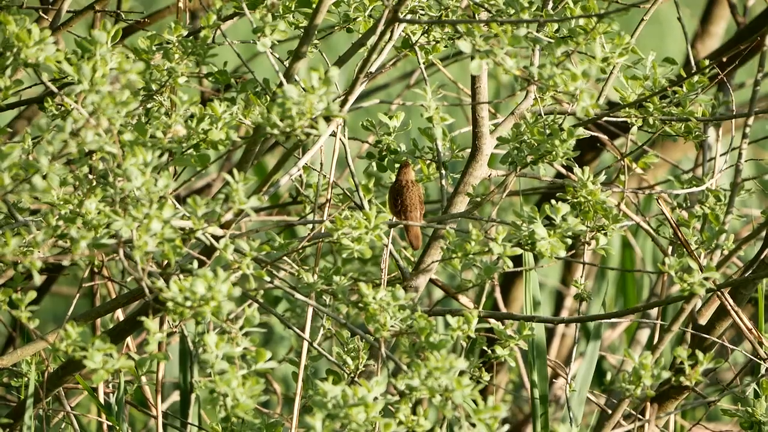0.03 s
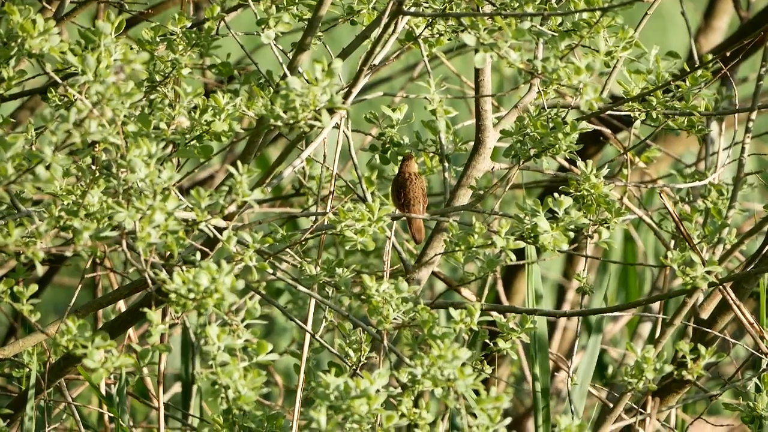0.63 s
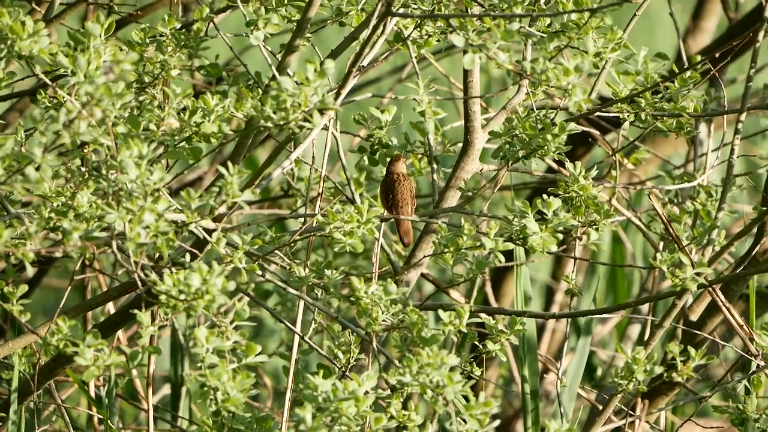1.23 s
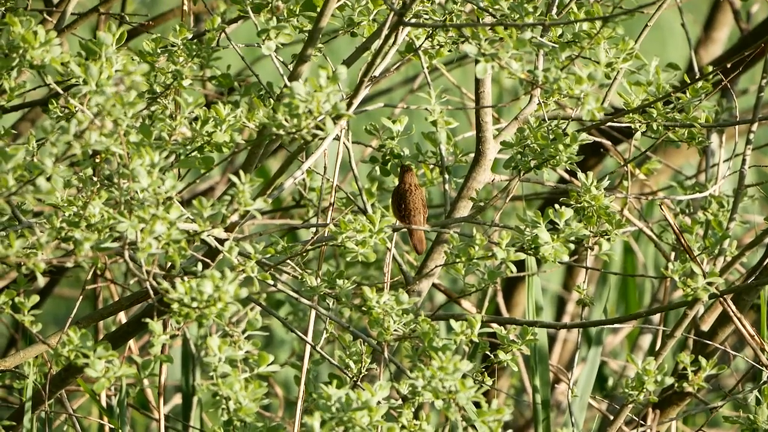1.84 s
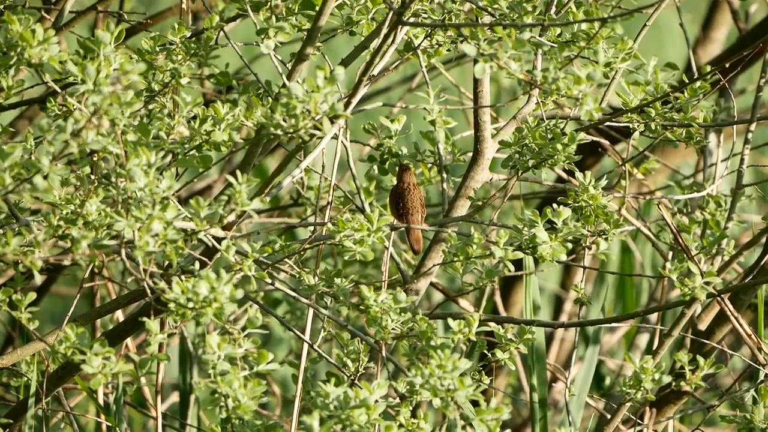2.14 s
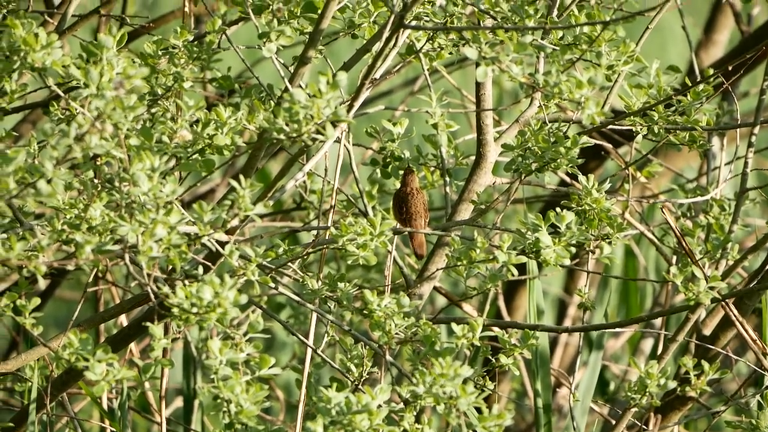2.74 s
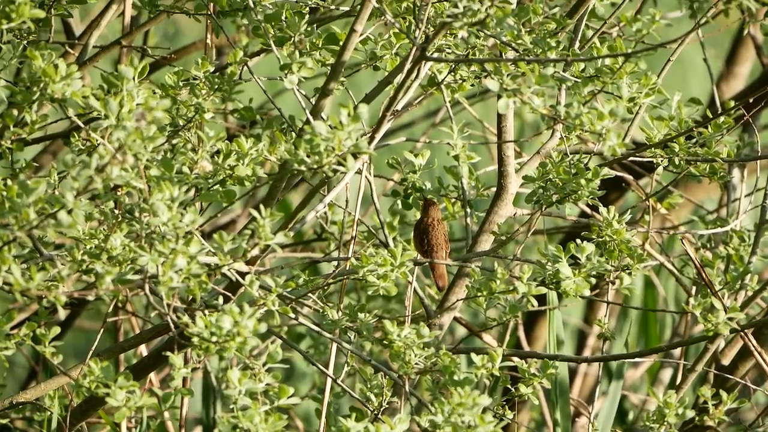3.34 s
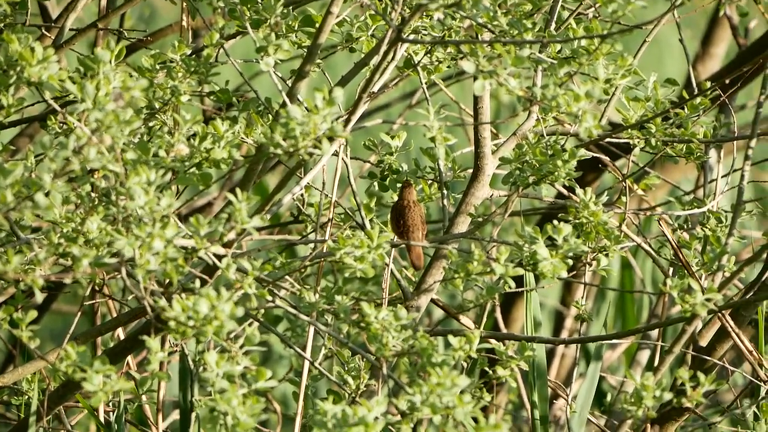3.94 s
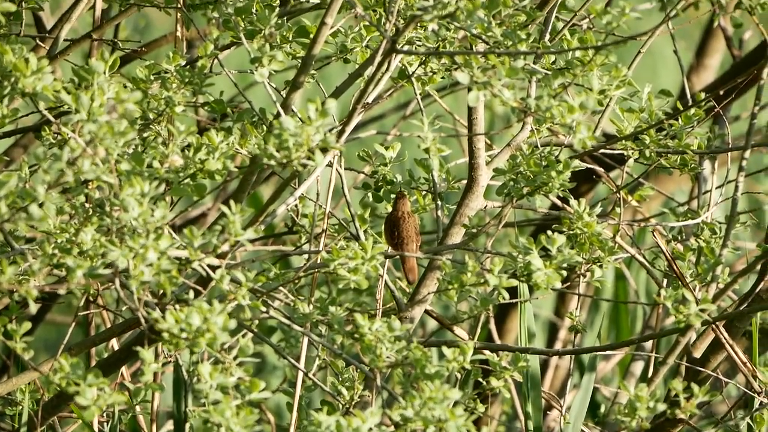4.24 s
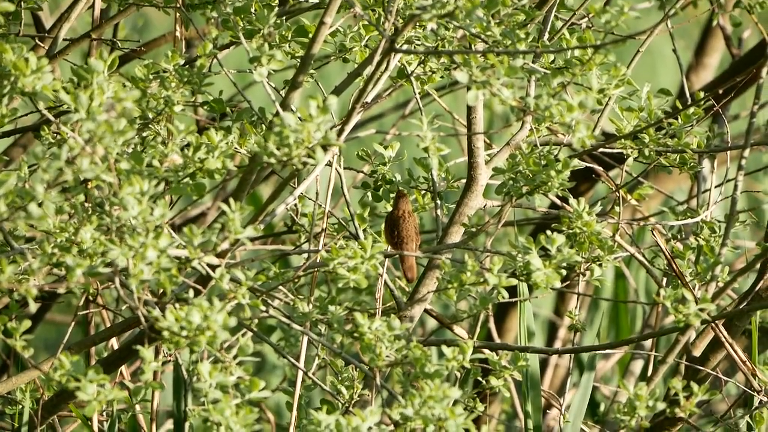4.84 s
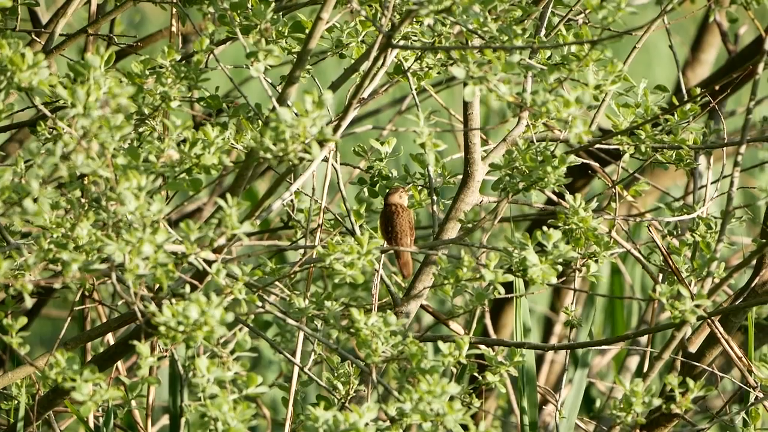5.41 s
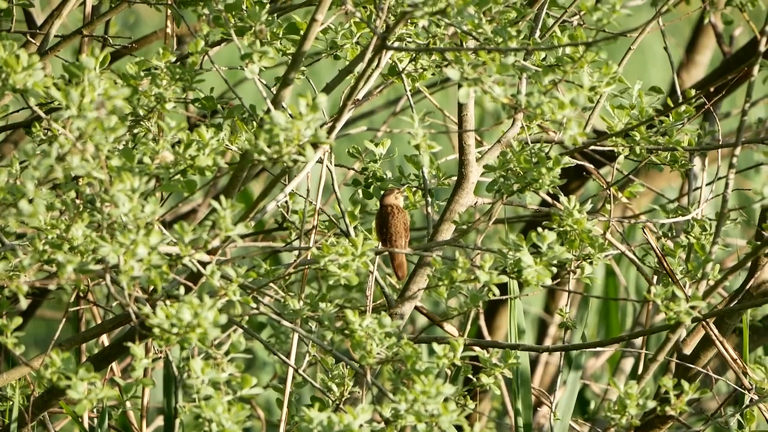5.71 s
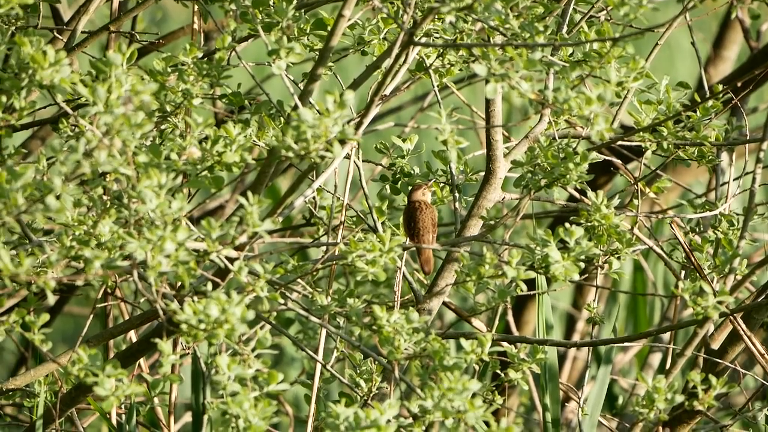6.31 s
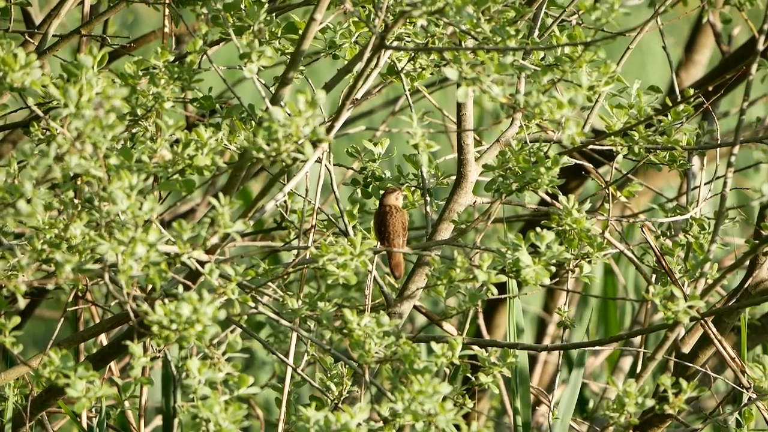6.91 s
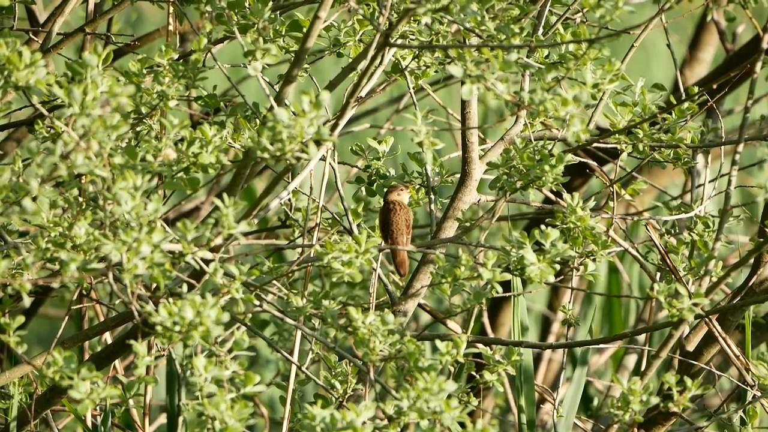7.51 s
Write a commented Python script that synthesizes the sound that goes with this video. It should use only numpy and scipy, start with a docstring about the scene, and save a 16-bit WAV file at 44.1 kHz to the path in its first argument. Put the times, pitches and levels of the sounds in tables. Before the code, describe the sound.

A grasshopper warbler reels a continuous high, buzzing trill over faint distant birds, softly hissing leaves and far-off traffic.

```python
"""Grasshopper warbler in a bush

A grasshopper warbler reels: its syrinx sweeps out a sharp tick and a short falling note, about 25
pairs a second, and twigs and reeds scatter the song. Farther off a small songbird runs down a phrase,
a second warbles and others purr low trills and hoarse slurs, all modulated tones. Beneath them lies
the broadband noise of leaves and a distant road. The microphone opens a quarter of a second in."""
import sys
import numpy as np
from scipy import signal
from scipy.io import wavfile
from scipy.ndimage import uniform_filter1d

SR = 44100
rng = np.random.default_rng(int(sys.argv[2]) if len(sys.argv) > 2 else 0)


def unload_audio(sound):
    """Save the sound as a 16-bit wav file, at the path given as the first command line argument."""
    columns = np.transpose(np.atleast_2d(sound))
    # keep every value between -1 and 1, then stretch to whole-number steps
    steps = np.round(np.clip(columns, -1, 1) * 32767)
    wavfile.write(sys.argv[1], SR, steps.astype(np.int16))


N = 337806


def gain_of(db):
    """The decibel scale: 20 dB is a factor of ten in amplitude."""
    return 10 ** (np.asarray(db) / 20)


def unit_rms(x):
    """Normalisation to unit mean power."""
    return x / np.sqrt(np.mean(x ** 2) + 1e-20)


def at_frequency(points, hz):
    """Interpolation of a spectrum on a logarithmic frequency axis."""
    point_hz, values = np.transpose(points)
    return np.interp(np.log(hz + 1), np.log(point_hz + 1), values)


def at_time(rows, t):
    """Linear interpolation of each column against the first, which is time."""
    times, *columns = np.transpose(rows)
    return [np.interp(t, times, column) for column in columns]


def add(mix, start_s, sound):
    """Superposition: a sound sums into the mix from start_s on."""
    part = mix[max(round(start_s * SR), 0):][:len(sound)]
    part += sound[:len(part)]


def diffuse_noise(spectrum, patchy_db, max_coherence):
    """A diffuse field: noise, partly coherent between left and right, with drifting patches of level."""
    # likeness of left and right: frequency_hz, coherence
    likeness = [(60, 0.54), (93, 0.85), (140, 0.83), (220, 0.65), (350, 0.16), (540, 0.56), (840, 0.69),
                (1310, 1), (2040, 0.22), (3160, 0.57), (4910, 0.52), (7630, 0.98)]
    # lean toward the road on the left: frequency_hz, left_minus_right_db
    balance = [(40, -7), (90, 1.5), (180, 3.5), (350, 5), (700, 6.5), (1300, 7.5), (2500, 1.1),
               (5000, -1.5)]
    frames, hz = N // 512 + 5, np.fft.rfftfreq(2048, 1 / SR)
    left_re, left_im, other_re, other_im, patches = rng.standard_normal((frames, len(hz), 5)).T
    patches = uniform_filter1d(patches, size=14, axis=0)  # across frequency
    patches = unit_rms(uniform_filter1d(patches, size=9, axis=1))  # across time
    coherence = np.clip(at_frequency(likeness, hz), -1, max_coherence)[:, None]
    left = left_re + 1j * left_im
    right = coherence * left + np.sqrt(1 - coherence ** 2) * (other_re + 1j * other_im)
    lean = gain_of(at_frequency(balance, hz) / 2)[:, None]
    spectra = np.array([left * lean, right / lean])
    spectra *= gain_of(at_frequency(spectrum, hz)[:, None] + patchy_db * patches)
    noise = signal.istft(spectra, nperseg=2048, noverlap=1536)[1][:, :N]
    return noise / noise.mean(0).std()


def leaves():
    """Broadband noise: leaves and the far hum of the countryside sum to a soft hiss."""
    # spectrum of the hiss: frequency_hz, relative_density_db
    hiss_spectrum = [(500, -24), (2000, 4.5), (2500, 1.5), (3000, -1), (4200, -1.5), (6000, -2),
                     (8500, -19.5), (12500, -27.5), (14000, -77)]
    return gain_of(-55.0) * diffuse_noise(hiss_spectrum, patchy_db=2.6, max_coherence=0.72)


def road(rumble_fade_db_per_s=0.62, drone_rise_db_per_s=0.08):
    """Incoherent sources add: a receding rumble, an engine drone and tyre roar swelling at each pass."""
    # spectra of deep rumble, engines and tyres on the road: frequency_hz, relative_density_db
    rumble_spectrum = [(20, -17), (40, -34), (58, -17), (76, 3.5), (100, 12), (122, 0), (170, -21),
                       (500, -68)]
    drone_spectrum = [(90, -53), (120, -14.5), (141, 3.5), (165, -10), (195, -10.5), (250, -9.5),
                      (340, -16), (600, -22.5), (1500, -92)]
    tyre_spectrum = [(150, -25), (400, -10.5), (580, -9), (780, -3), (1000, 0), (1350, -6.5), (1800, -12),
                     (2400, -24.5), (4000, -39), (9000, -78)]
    # swell of the tyre roar as cars pass: time_s, level_db
    passing = [(0.4, -41.5), (1.2, -37.5), (1.3, -39), (2.4, -40), (2.6, -37), (2.8, -40.5), (3.1, -38.5),
               (3.4, -41), (4.5, -38.5), (5.1, -39.5), (5.8, -43), (6.1, -39.5), (7.3, -40), (7.5, -42)]
    t = np.arange(N) / SR
    rumble = diffuse_noise(rumble_spectrum, patchy_db=0.0, max_coherence=1.0)
    drone = diffuse_noise(drone_spectrum, patchy_db=1.2, max_coherence=1.0)
    tyres = diffuse_noise(tyre_spectrum, patchy_db=0.9, max_coherence=0.75)
    return (rumble * gain_of(-47 - rumble_fade_db_per_s * t)
            + drone * gain_of(-47.5 + drone_rise_db_per_s * t)
            + tyres * gain_of(at_time(passing, t)[0] + 0.37))


def scatter(x, t60_s, onset_s, width, sway_hz):
    """Multiple scattering: swaying plants return dense, decaying echoes; width is side over mid."""
    t = np.arange(SR) / SR
    responses = rng.standard_normal((2, 2, SR)) * gain_of(-60 * t / t60_s) * (1 - np.exp(-t / onset_s))
    echoes = signal.oaconvolve(x[None, None], responses, axes=2)[:, :, :N]
    # moving leaves trade one echo pattern for another
    sway = 2 * np.pi * sway_hz * np.arange(N) / SR
    mid, side = (unit_rms(a * np.cos(sway) + b * np.sin(sway)) * x.std() for a, b in echoes)
    return np.array([mid + width * side, mid - width * side])


def songbird_buzz(start_s=4.96, length_s=0.484, ramp_s=0.029):
    """Band noise under a trapezoidal envelope: the dry buzz in the far songbird's flourish."""
    # spectrum of the buzz: frequency_hz, relative_density_db
    buzz_spectrum = [(1500, -13), (2400, 2), (3300, -3), (4600, -4), (6000, -44)]
    t = np.arange(N) / SR - start_s
    envelope = np.clip(np.minimum(t, length_s - t) / ramp_s, 0, 1)
    return gain_of(-52) * envelope * diffuse_noise(buzz_spectrum, patchy_db=2.0, max_coherence=.7)


def whistles(rows, waver, flutter_db, taper, purr=0, purr_hz=0, quavers=16):
    """Frequency and amplitude modulation: gliding tones that quaver at random and may purr in pulses."""
    # one or two strokes per syllable: start_share, end_share, then evenly spaced pitch_ratios
    strokes = {"arch": [(0, 1, .91, 1, .96)], "bow": [(0, 1, .89, 1, .81)], "droop": [(0, 1, .97, 1, .94)],
               "sag": [(0, 1, .93, 1, .99, .925, .905)], "lift": [(0, 1, .89, 1, 1.02)],
               "fall": [(0, 1, 1.06, 1, .94)], "slide": [(0, 1, 1.1, 1, .89)],
               "rise": [(0, 1, .91, 1, 1.12)], "cup": [(0, 1, 1.11, 1, 1.07)],
               "hook": [(0, 1, 1.13, 1, 1.03)], "peak": [(0, .55, .84, 1, 1.12), (.45, 1, 1.12, .97, .81)],
               "dip": [(0, .45, 1.17, 1.02, .79), (.6, 1, .8, .98, 1.13)]}
    song = np.zeros(N)
    for start_s, length_s, pitch_hz, level_db, name in rows:
        for begin, end, *ratios in strokes[name]:
            samples = max(int((end - begin) * length_s * SR), 64)
            progress = np.linspace(0, 1, samples)
            bend = np.polyfit(np.linspace(0, 1, len(ratios)), ratios, len(ratios) - 1)
            hz = pitch_hz * np.polyval(bend, progress)
            quaver, flutter = (np.interp(progress, np.linspace(0, 1, quavers), knots)
                               for knots in rng.standard_normal((2, quavers)))
            tone = np.sin(2 * np.pi * np.cumsum(hz * (1 + waver * quaver)) / SR)
            pulse = 1 + purr * np.cos(2 * np.pi * purr_hz * np.arange(samples) / SR)
            envelope = pulse * gain_of(flutter_db * flutter) * signal.windows.tukey(samples, taper)
            add(song, start_s + begin * length_s, gain_of(level_db) * unit_rms(tone * envelope))
    return song


def chip_run(start_s=.787, spacing_s=.039, length_s=.016, pitch_hz=3730, step_db=1.5):
    """Geometric decay: five quick arched chips, each weaker than the last by the same ratio."""
    rows = [(start_s + k * spacing_s, length_s, pitch_hz, -55 - k * step_db, "arch") for k in range(5)]
    return whistles(rows, waver=.008, flutter_db=1.5, taper=.5)


def far_birds():
    """Direct and reverberant sound: distant songs arrive with a wash of echoes from the trees."""
    # the songs: start_s, length_s, pitch_hz, relative_level_db, syllable
    trill_score = [(.38, .135, 1774, -47, "droop"), (.56, 0.18, 2570, -61.5, "droop"),
                   (1.105, 0.045, 1850, -43.5, "droop"), (1.68, 0.097, 1847, -47, "droop"),
                   (2.56, 0.29, 1920, -53, "sag"), (3.67, 0.32, 1953, -43.5, "sag"),
                   (4.83, 0.17, 1854, -40.5, "droop"), (5.76, 0.16, 1870, -50.5, "droop"),
                   (7.09, 0.086, 1880, -55, "lift")]  # low and purring
    slur_score = [(.62, 0.096, 4080, -57, "droop"), (.76, 0.18, 1970, -53, "slide"),
                  (1.49, 0.13, 1880, -52, "fall"), (1.58, .13, 2960, -60, "droop"),
                  (2.3, .2, 2920, -61, "droop"), (2.98, 0.22, 1970, -54.5, "slide"),
                  (3.08, 0.21, 2950, -64, "lift"), (3.55, 0.12, 2080, -48, "fall"),
                  (4.11, 0.2, 1990, -49, "slide"), (5.06, 0.24, 1883, -49.5, "slide"),
                  (5.625, .08, 4060, -52, "cup"), (6.34, 0.065, 3980, -53, "cup")]  # hoarse, from the farthest birds
    chirp_score = [(.81, .025, 3070, -63, "fall"), (1.415, 0.016, 3070, -57, "fall"),
                   (3.035, 0.05, 4010, -58, "droop"), (3.215, 0.044, 4060, -54, "arch"),
                   (3.385, 0.07, 4010, -53.5, "droop"), (3.57, 0.05, 4270, -55, "bow"),
                   (3.635, 0.037, 3520, -49, "slide"), (3.765, 0.07, 3660, -50, "peak"),
                   (3.91, 0.088, 3410, -51.5, "dip"), (4.09, 0.075, 3684, -48.5, "peak"),
                   (4.238, .098, 3490, -51, "dip"), (4.425, 0.085, 3330, -51, "dip"),
                   (4.58, 0.038, 3900, -52, "hook"), (4.615, 0.065, 3610, -48.5, "peak"),
                   (4.76, 0.075, 3330, -53, "bow"), (4.915, 0.12, 3370, -50, "rise"),
                   (4.99, 0.033, 4720, -50, "fall"), (6.02, .026, 3720, -53, "hook"),
                   (6.922, 0.047, 4250, -62, "fall")]  # small birds, with the descending phrase from 3 to 5 s
    warble_score = [(5.125, .085, 2870, -51, "arch"), (5.272, .065, 2760, -50, "rise"),
                    (5.35, .043, 2850, -54, "droop"), (5.44, 0.052, 2740, -49.5, "lift"),
                    (5.59, 0.17, 2860, -52.5, "rise"), (6.4, .035, 2800, -58, "rise"),
                    (6.53, 0.047, 2750, -59, "rise"), (6.622, .04, 3000, -57, "fall"),
                    (6.663, .025, 2800, -55, "rise"), (6.768, .022, 3870, -56, "arch"),
                    (6.812, 0.083, 2990, -63, "bow"), (6.935, .04, 3000, -64, "hook"),
                    (6.965, 0.026, 2800, -56, "lift"), (6.995, 0.056, 2970, -61, "droop"),
                    (7.098, .022, 3700, -54, "lift"), (7.28, 0.05, 3030, -57, "droop")]  # soft and clear, from 5 s on
    trills = whistles(trill_score, waver=0.016, flutter_db=2.5, taper=0.18, purr=0.97, purr_hz=51.0)
    slurs = whistles(slur_score, waver=0.0404, flutter_db=2.5, taper=0.43,
                     purr=0.63, purr_hz=44.9, quavers=40)
    chirps = whistles(chirp_score, waver=0.021, flutter_db=4.0, taper=0.29, purr=0.13, purr_hz=81.6)
    warble = whistles(warble_score, waver=0.0062, flutter_db=4.5, taper=0.21)
    chips = chip_run()
    trill_echo = scatter(trills, t60_s=0.69, onset_s=0.0042, width=0.73, sway_hz=0.507)
    slur_echo = scatter(slurs, t60_s=0.33, onset_s=0.003, width=0.45, sway_hz=0.56)
    chirp_echo = scatter(chirps, t60_s=0.39, onset_s=0.0015, width=0.57, sway_hz=0.697)
    warble_echo = scatter(warble, t60_s=0.4, onset_s=0.006, width=0.76, sway_hz=0.585)
    low = gain_of(-1.0) * trills + gain_of(-4.5) * trill_echo
    hoarse = gain_of(-3.0) * slurs + gain_of(-2.5) * slur_echo
    high = gain_of(-2.0) * chirps + gain_of(-0.6) * chirp_echo
    clear = gain_of(-2.0) * warble + gain_of(-10) * warble_echo
    # both groups sit a little to the left
    return (low + hoarse) * gain_of([[1], [-1]]) + (high + clear + chips) * gain_of([[.7], [-.7]])


def syllable(contour, stretch, tune, octave_db, rolloff_db_per_khz=17):
    """Source and filter: the syrinx sweeps a near-pure tone; the throat damps its octave as it rises."""
    ms = np.arange(0, contour[-1][0] * stretch, 1000 / SR)
    hz, db = uniform_filter1d(np.array(at_time(contour, ms / stretch)), size=7, axis=1, mode="nearest")
    phase = 2 * np.pi * np.cumsum(hz * tune) / SR
    above_median_khz = (hz - np.median(hz)) / 1000
    octave = gain_of(octave_db - rolloff_db_per_khz * above_median_khz) * np.sin(2 * phase)
    return gain_of(db) * signal.windows.tukey(len(ms), .1) * (np.sin(phase) + octave)


def bush(ticks, notes):
    """Early reflections and diffuse scattering join the direct song and smear it."""
    # reflections from the nearest branches and the ground: delay_ms, gain_db
    reflections = [(2.1, -11.5), (6.5, -14.5), (20.7, -17)]
    direct = ticks + notes
    early = direct.copy()
    for delay_ms, gain_db in reflections:
        add(early, delay_ms / 1000, gain_of(gain_db) * direct)
    # fine twigs throw back the higher tick more strongly than the note
    diffuse = scatter(notes + gain_of(2.0) * ticks, t60_s=0.34, onset_s=0.00035, width=0.16, sway_hz=0.597)
    return gain_of(3.5) * early + gain_of(-1.5) * diffuse


def grasshopper_warbler(tick_lead_s=.0016, note_lag_s=.0107, jitter_s=.0003):
    """A quasi-periodic pulse train: tick, gap, note, each pair a little different, sung in a bush."""
    # pace of the reel, easing as the bird sings on: time_s, pairs_per_s
    tempo = [(0.27, 25.209), (1.05, 25.144), (1.55, 24.644), (2.0, 24.753), (2.45, 24.818), (2.9, 24.329),
             (3.3, 24.783), (3.85, 24.559), (4.3, 24.559), (4.85, 24.412), (5.08, 23.779), (5.35, 24.533),
             (5.8, 24.329), (6.25, 24.619), (6.85, 24.204), (7.2, 24.448), (7.6, 24.157)]
    # the reel as the bird turns its head: time_s, relative_level_db, pitch_hz, tick_accent_db
    reel = [(.27, -31.5, 6030, -1), (.6, -31.5, 6190, -0.5), (.9, -33.5, 6070, -1.5), (1.15, -32, 6100, -2),
            (1.37, -33, 6020, 2), (1.75, -32.5, 6060, 1), (1.97, -31.5, 6060, 1.3), (2.18, -32.5, 6030, 1),
            (2.47, -31.5, 6090, 0), (2.77, -31.5, 6050, -0.5), (3.0, -34.2, 6020, 2.3),
            (3.28, -34, 5960, -.8), (3.52, -35, 6100, 2.5), (3.77, -30.6, 6000, 1.3),
            (3.98, -33.5, 6140, 1.3), (4.15, -31.5, 6060, 1), (4.26, -33.5, 6120, 0.5),
            (4.4, -31.5, 5990, 1), (4.76, -30, 6040, -3), (5.1, -34, 6080, 2), (5.3, -32, 6090, 1),
            (5.62, -33, 6020, 0), (5.88, -33, 6100, 0), (6.25, -33.5, 6090, 0), (6.6, -33.5, 6120, 1.2),
            (7.0, -31.1, 6030, 0.5), (7.3, -32, 6010, -1), (7.55, -34, 6090, 2)]
    # contours of the two syllables: time_ms, pitch_hz, relative_level_db
    tick_contour = [(0, 4570, -10), (.3, 5050, -7.5), (.55, 5160, -6), (.8, 5300, -4), (1.0, 6170, 2.5),
                    (1.4, 6370, 4), (1.75, 6314, 6.5), (2.0, 6650, 0), (2.3, 7340, -21), (2.9, 8500, -33)]
    note_contour = [(0, 6530, -20), (.6, 6440, -2), (1.3, 6245, 2.5), (2.0, 6075, 2.5), (3.2, 5960, -.5),
                    (4.3, 5986, -2.5), (5.4, 5920, 1), (6.3, 5730, -8), (7.4, 5700, -36)]
    t = np.arange(N) / SR
    pairs_sung = np.cumsum(at_time(tempo, t)[0]) / SR
    pairs_sung -= np.interp(.268, t, pairs_sung)  # one pair falls at 0.268 s
    starts_s = np.interp(np.arange(np.ceil(pairs_sung[0]), pairs_sung[-1]), pairs_sung, t)
    levels_db, pitches_hz, accents_db = at_time(reel, starts_s)
    tunes = pitches_hz / pitches_hz.mean()
    ticks, notes = np.zeros((2, N))
    for start_s, level_db, accent_db, tune in zip(starts_s, levels_db, accents_db, tunes):
        tick = syllable(tick_contour, stretch=rng.normal(1, 0.1),
                        tune=rng.normal(1, 0.015), octave_db=-45)
        note = syllable(note_contour, stretch=rng.normal(1, 0.092),
                        tune=tune * rng.normal(1, 0.0068), octave_db=-41.5)
        tick_s = start_s - tick_lead_s + rng.normal(0, jitter_s)
        add(ticks, tick_s, tick * gain_of(level_db + accent_db + rng.normal(-1.5, 1.1)))
        add(notes, start_s + note_lag_s, note * gain_of(level_db + rng.normal(0.75, 0.72)))
    return bush(ticks, notes)


def scene():
    """Superposition of the near warbler with leaves, far birds and the road."""
    return leaves() + grasshopper_warbler() + far_birds() + songbird_buzz() + road()


def record(dry):
    """Gating and band limiting: the microphone opens abruptly, and a low-pass cuts the top treble."""
    open_s, ramp_samples, cutoff_hz = .2505, 130, 13500
    gate = np.clip((np.arange(N) - open_s * SR) / ramp_samples, 0, 1)
    lowpass = signal.firwin(255, cutoff_hz, window=("kaiser", 9), fs=SR)
    return signal.oaconvolve(dry * gate, lowpass[None], "same")


dry = scene()
out = record(dry)
unload_audio(out)
```